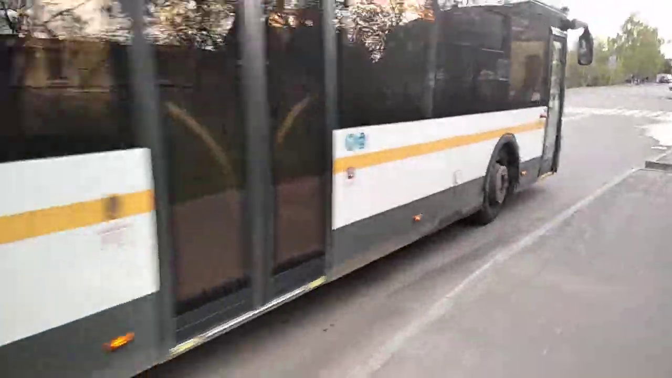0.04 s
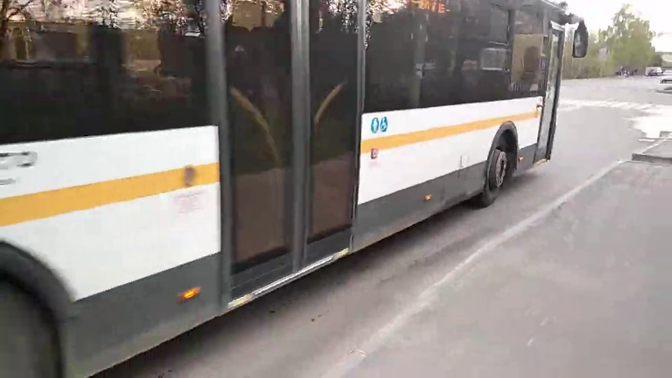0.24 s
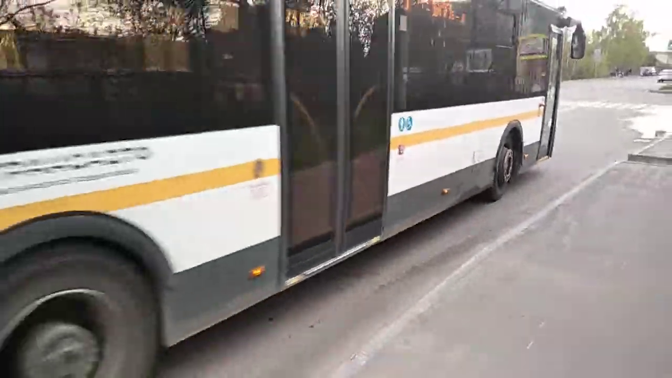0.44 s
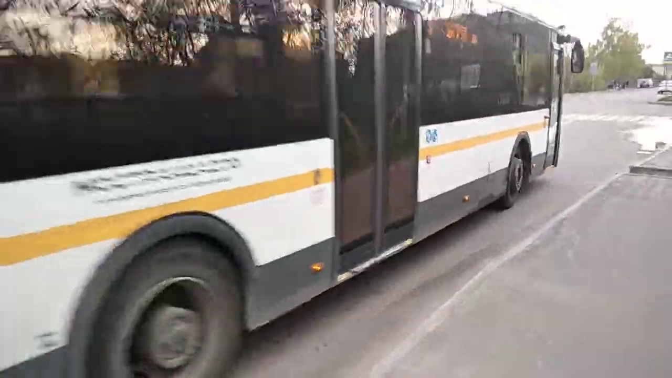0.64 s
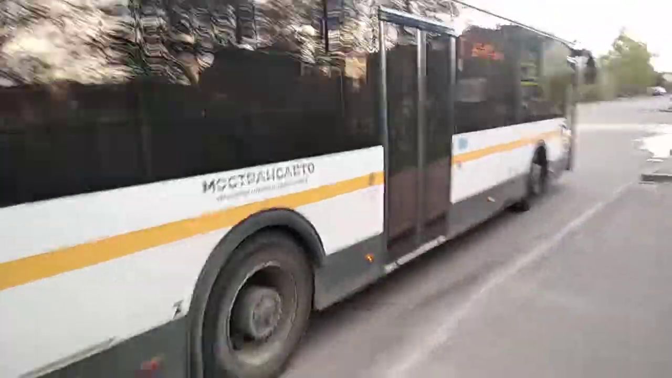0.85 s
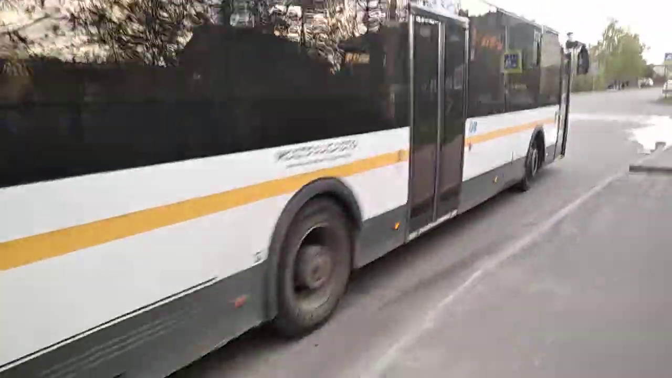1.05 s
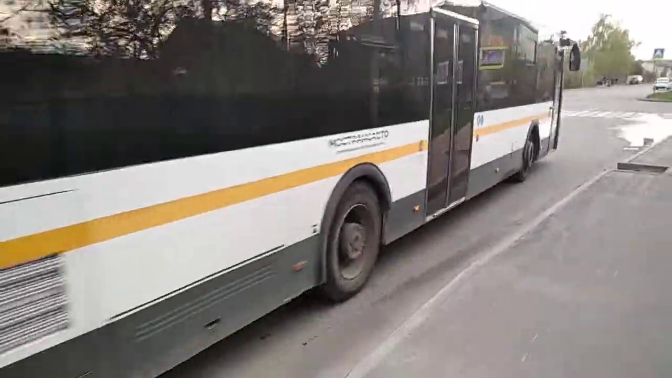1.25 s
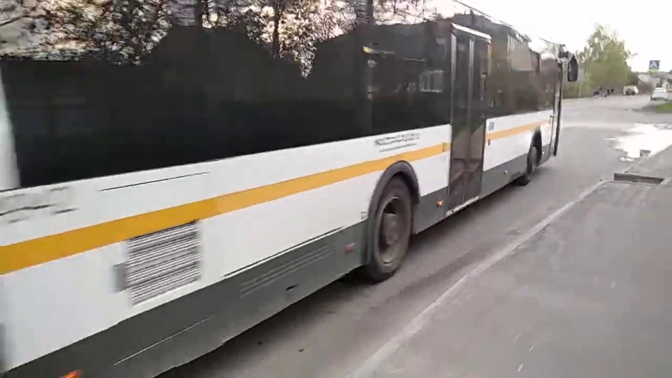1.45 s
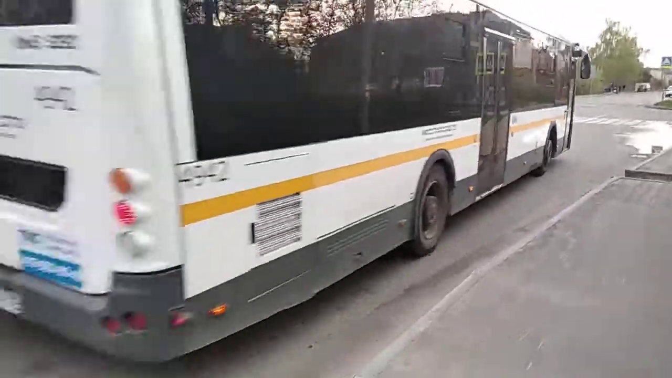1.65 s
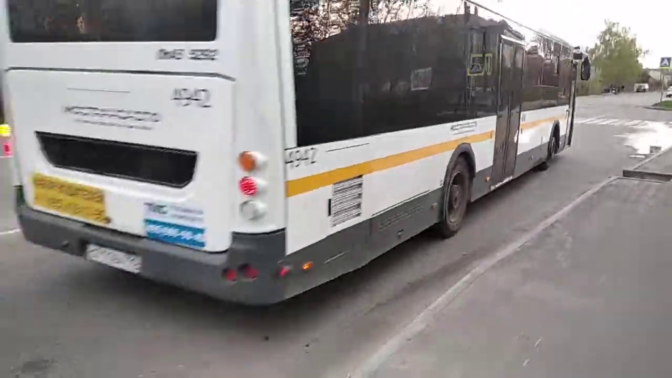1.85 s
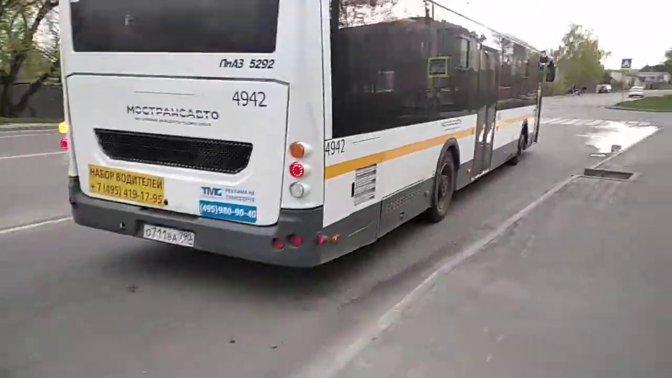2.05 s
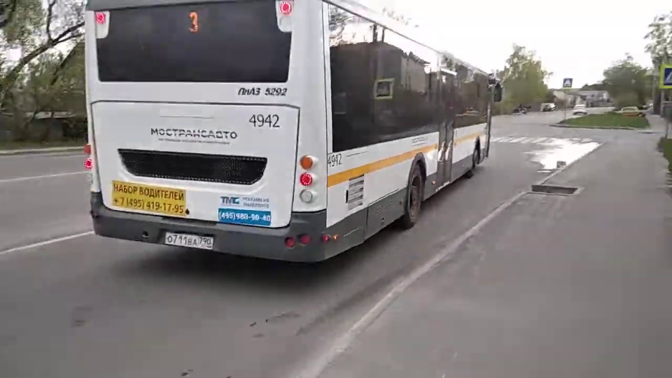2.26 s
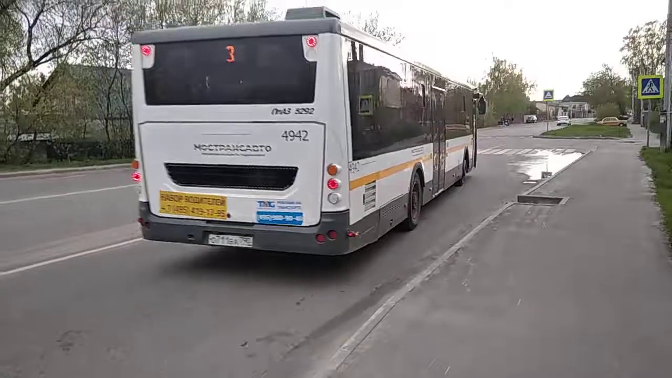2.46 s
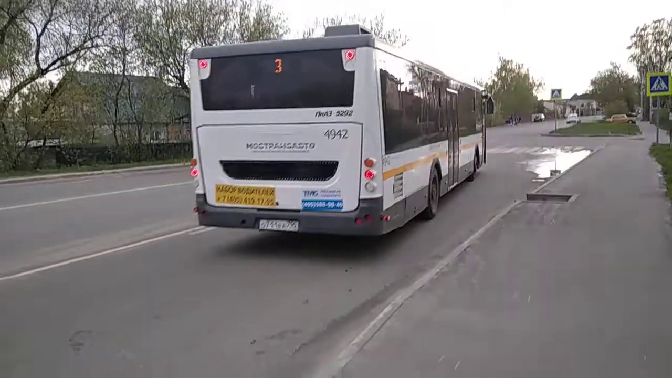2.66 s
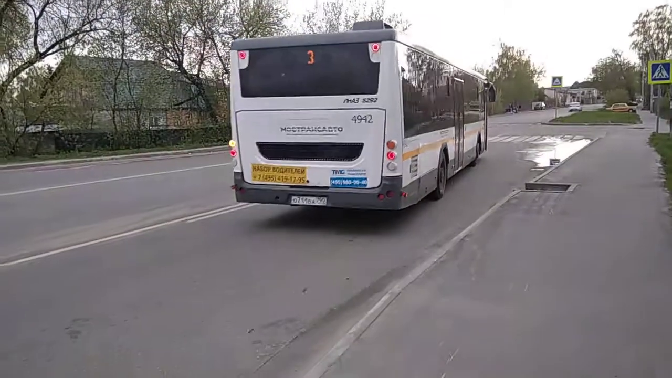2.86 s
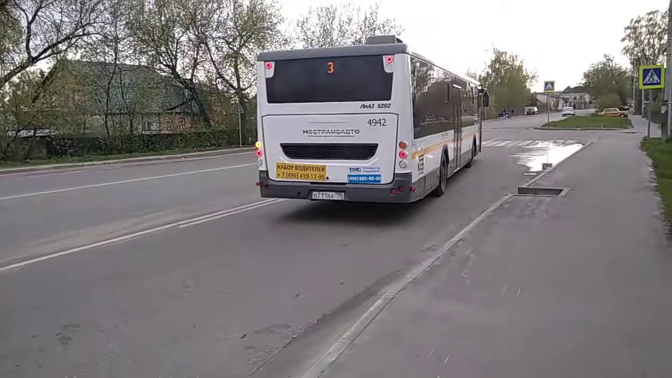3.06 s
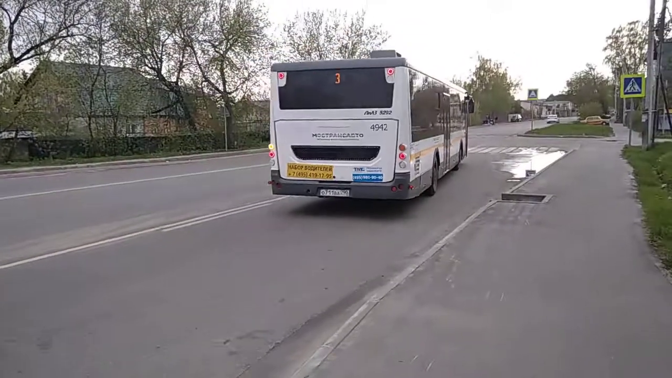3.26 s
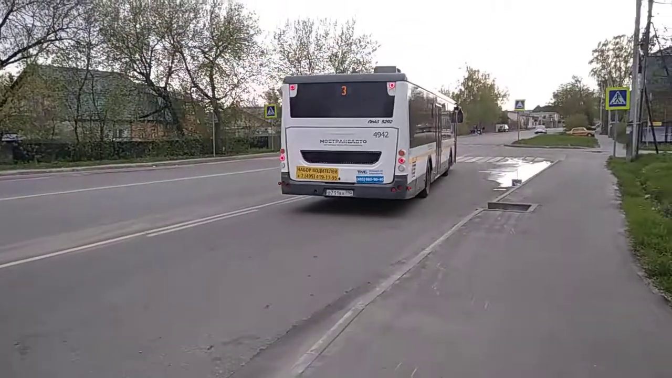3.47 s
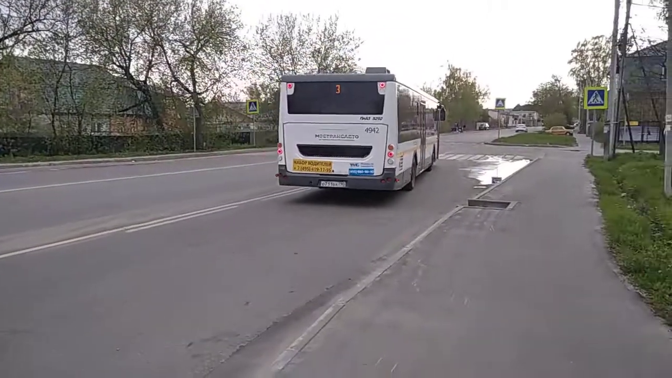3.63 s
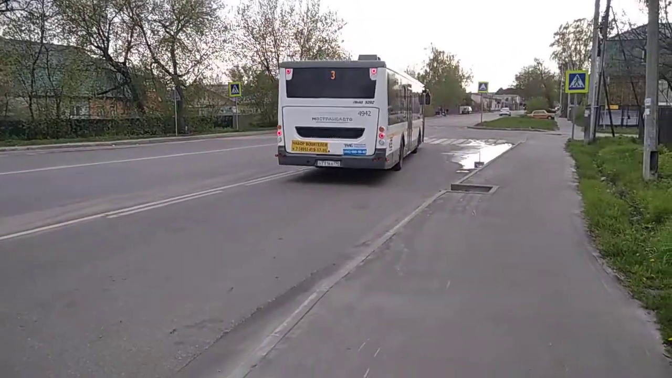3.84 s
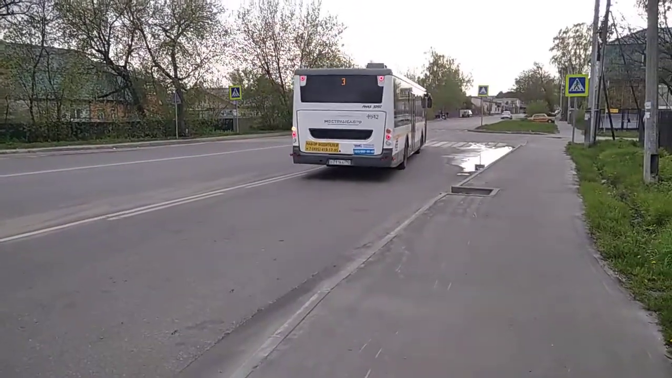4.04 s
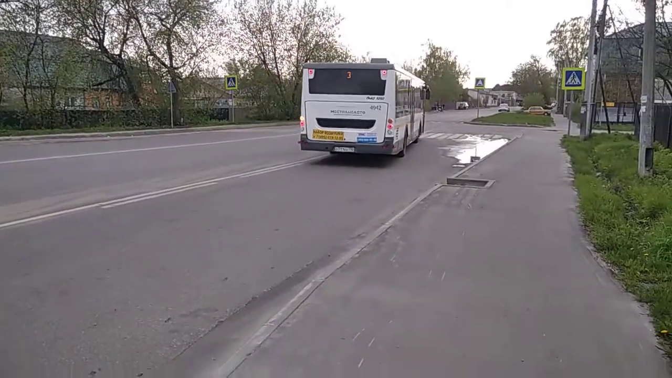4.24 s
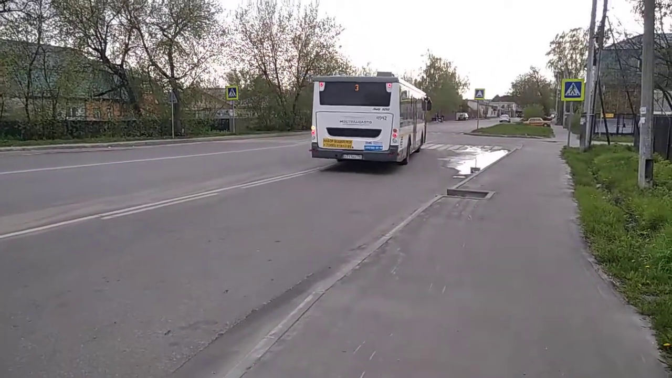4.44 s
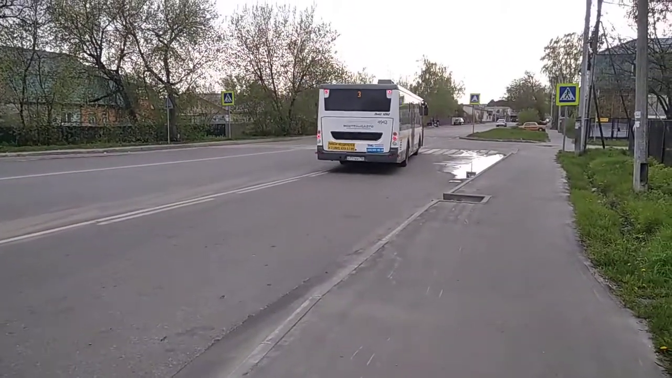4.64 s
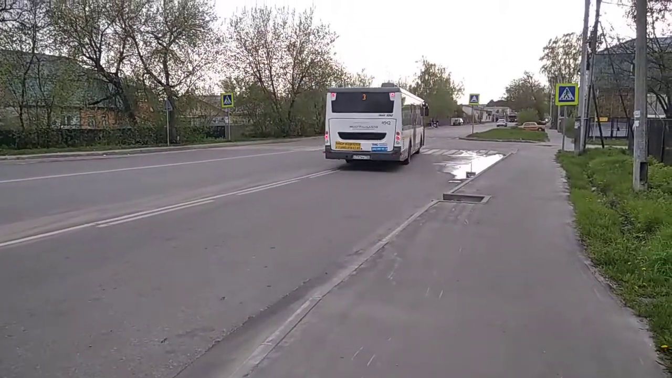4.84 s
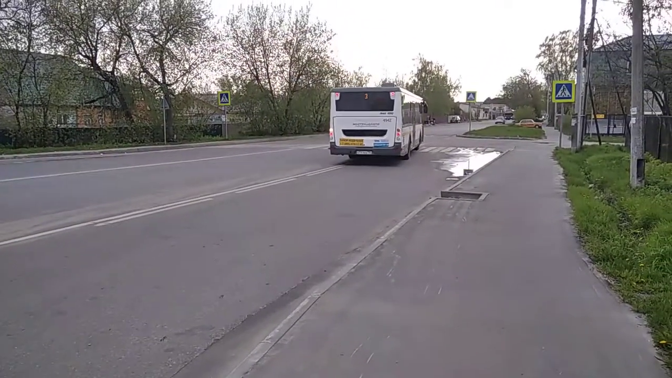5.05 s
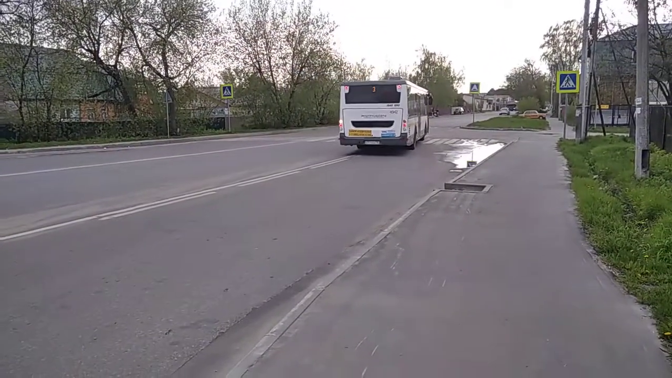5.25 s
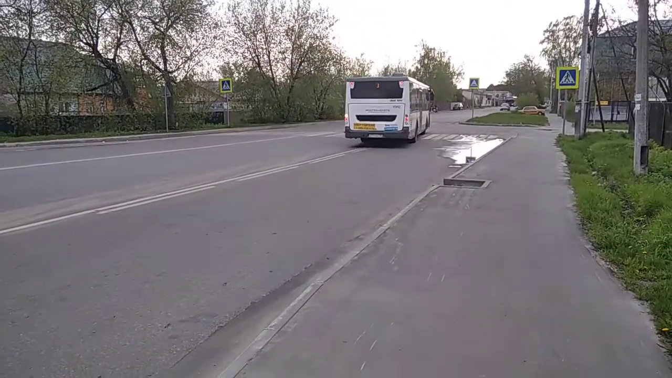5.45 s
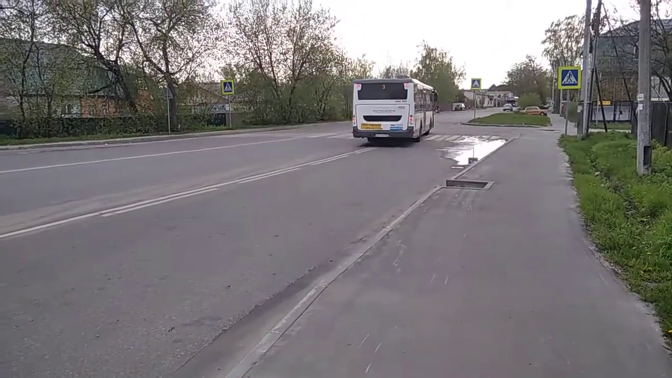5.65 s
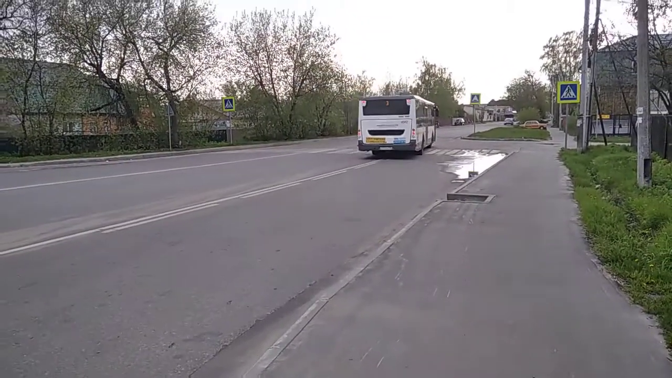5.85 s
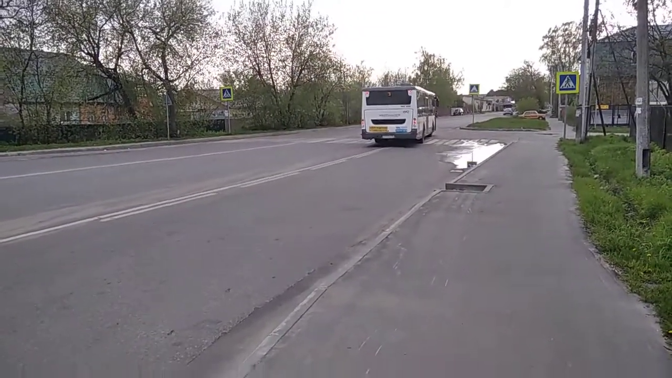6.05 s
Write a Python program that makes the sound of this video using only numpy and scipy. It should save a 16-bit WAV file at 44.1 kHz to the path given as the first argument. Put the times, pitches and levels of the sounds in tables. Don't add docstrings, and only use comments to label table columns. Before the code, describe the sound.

On an open street, a hand-held stereo microphone stands about three metres from a passing diesel bus. From the start a deep, steady exhaust throb near 56 Hz sits under a rough engine roar, with clatter and an airy intake hiss building over the first 0.7 seconds. Between about 0.4 and 1.4 seconds, thin axle, pump, air-valve and rising turbo whines flicker through. The engine and tail pipe sweep by at roughly 1.75 to 1.9 seconds, the fullest moment, and a humming cooling fan stands out behind. From 2.4 seconds the bus recedes, its treble thinning and colour shifting with echoes off the road. At about 5 seconds the driver lifts off; the pitch slides down quickly and the engine fades low. Small plastic case ticks come at 5.28 and 5.69 seconds over a quiet wash of far traffic and leaves.

```python
import sys
import numpy as np
from scipy import signal
from scipy.fft import rfft, irfft
from scipy.io import wavfile
from scipy.ndimage import uniform_filter1d, map_coordinates

SR = 44100
rng = np.random.default_rng(int(sys.argv[2]) if len(sys.argv) > 2 else 0)


def attenuation_scalar(level_db):
    decades = np.asarray(level_db, float) / 20
    return 10 ** decades


def dump(signal):
    limited = np.clip(np.atleast_2d(signal).T, -1, 1)
    pcm = np.round(limited * 32767).astype(np.int16)
    wavfile.write(sys.argv[1], SR, pcm)


N = 269010
TIME = np.arange(N) / SR

# [time_s, firing_hz, level_db]
FIRING = [(0, 56.2, -27.5), (.3, 56.5, -25.5), (1.2, 57.4, -27.7), (1.5, 58.7, -27.4), (1.8, 59.9, -29),
          (2.15, 60.4, -29.2), (2.7, 59.7, -32.1), (3, 59.05, -35.8), (3.5, 59.2, -34), (3.8, 58.1, -37.6),
          (4.3, 56.85, -41.5), (4.55, 55.65, -37), (4.8, 54.5, -38.7), (5, 52.1, -43), (5.15, 48, -45.5),
          (5.35, 40.6, -52), (5.6, 35.7, -54), (6.1, 32.5, -51.5)]
# [multiple of firing rate, under_firing_db]
UNEVEN_ORDERS = [(0.752, -23), (1.25, -25), (1.75, -34), (2, -25.5), (2.5, -26), (3, -26), (4, -28.5)]
# [nearest_db, share of distance loss, from_behind_db, lift_off_db, corner_db]
BAY_LAYERS = [
    (-38, 0.89, 1.05, -12, 3.5),
    (-44.5, 0.98, 0.9, -4.5, 0.5),
    (-46, 1.2, -2, -8, 2),
    (-45, 1.14, -6, -11, -1.5),
]
# [freq_hz, level_db]
RUMBLE_SPECTRUM = [(41, -32), (70, -5), (85, -7), (107, -10), (161, -10), (215, -12), (258, -11.5),
                   (321, -11.5), (531, -33.5), (620, -25), (810, -32), (1360, -120)]
ROAR_SPECTRUM = [(280, -4.5), (480, 0.5), (603, -7.5), (1060, -6), (1230, -9), (1540, -7.5), (2190, -13),
                 (2800, -27), (3640, -20), (6160, -120)]
CLATTER_SPECTRUM = [(1350, 1), (2300, 3), (3040, 3.5), (3280, -1.5), (5070, -2), (7600, -8), (9880, -3),
                    (16700, -120)]
INTAKE_SPECTRUM = [(4000, -6.5), (6800, -2.5), (7600, -3), (9320, -1), (11500, -7.5), (13700, -12),
                   (14200, -9.5)]
# [multiple of shaft rate, under_rumble_db]
COMPRESSOR_LINES = [(2, -11), (3, -16), (6, -14)]
# [start_s, hold_s, level_db, rise_db_per_s, fall_db_per_s]
FAN_SWELLS = [
    [(.3, .01, -45.5, 43, 11), (1.38, 0.0091, -46, 60, 40), (1.72, 1.85, -40, 54, 8.5),
     (4.9, 0.17, -51.5, 20, 25)],
    [(.3, 0.0091, -64, 60, 32), (1.75, .25, -42, 28, 26), (3, 0.24, -47.5, 30, 19),
     (5.15, .01, -52.5, 18, 80)],
    [(.7, 0.63, -53, 7, 30), (1.7, 0.54, -43, 25, 14.5), (3.7, 0.47, -59, 36, 24), (5, .15, -59.5, 34, 38)],
]
# [start_s, hold_s, level_db, rise_db_per_s, fall_db_per_s]
PUMP_SWELLS = [
    [(.4, .14, -53.5, 70, 140), (.79, .31, -52, 120, 45), (2.4, .01, -66, 12, 10)],
    [(.55, .35, -60, 30, 50), (1.1, .5, -62, 40, 50), (2.1, .7, -64, 30, 20)],
    [(1.2, .15, -66, 40, 30)],
]
# [time_s, pitch_hz]
TURBO_PITCH = [(.6, 5840), (1.1, 6190), (1.9, 6740), (2.55, 7020), (3.1, 7090), (4.3, 7030)]
# [start_s, hold_s, level_db, rise_db_per_s, fall_db_per_s]
TURBO_SWELLS = [(.73, .08, -61, 200, 100), (1.08, .04, -63, 40, 20), (1.9, .01, -65, 35, 30),
                (2.55, .6, -68, 25, 24), (3.7, .2, -73, 14, 20)]
AXLE_SWELLS = [(.45, .15, -48, 100, 60), (.79, .02, -42, 60, 150), (.93, .12, -46, 60, 90)]
VALVE_SWELLS = [(.76, .14, -58, 200, 60), (1, .3, -63, 60, 100)]
# [freq_hz, level_db]
STREET_SPECTRUM = [(20, -40), (34, -10), (52, -7), (75, -21), (125, -9.5), (190, -15.5), (266, -11.5),
                   (529, -32), (764, -27), (1380, -33), (1760, -29), (3340, -49), (6030, -41),
                   (14200, -60.5)]
# [start_s, peak_db, ring_hz, second_ring_hz, crack share]
CASE_TICKS = [
    (5.2772, -42, 7500, 9300, .4),
    (5.2808, -38, 240, 1100, .01),
    (5.282, -51, 8500, 12500, .3),
    (5.6917, -41, 900, 7200, .02),
    (5.692, -35, 1750, 4200, .02),
    (5.6933, -37, 1780, 6900, .02),
]
# [time_s, left_lag_samples, left_treble_lean_db]
CAMERA_TURN = [(0, 21, -2), (.6, 17, 0), (1, 16, 9), (1.5, 12, 10), (2, 5.5, 12.5), (2.75, 0.5, 8.5),
               (3.3, -0.7, 7), (4.5, 1.5, 6), (5.5, -3.5, 7.5), (6.1, -4.5, 13)]
# [centre_hz, width_hz, level_db]
LEFT_AIMED = [(484, 68, -7), (1373, 150, -4.5), (1700, 250, -2), (2860, 840, -1), (4070, 195, 11.5),
              (4690, 290, 7), (6130, 400, 2), (7120, 160, 6), (9500, 950, 3.5)]
RIGHT_AIMED = [(503, 79, -9.5), (1290, 89, -11), (1770, 400, -8.5), (2330, 260, -0.5), (3310, 79, 5.5),
               (6240, 470, 2.5), (7000, 120, -2), (8100, 450, 7.5)]
LEFT_BESIDE = [(1940, 230, -1), (3860, 50, 6), (4140, 120, 0), (6900, 740, -2), (9450, 460, 0)]
RIGHT_BESIDE = [(666, 31, -4), (3400, 110, 0.5), (4260, 100, 7), (5900, 500, 1.5), (6900, 300, -1)]
# [centre_hz, width_hz, lag_rad]
CASE_TWIST = [(2150, 510, 1), (7100, 700, -1.1)]
# [freq_hz, likeness 0-1]
PORT_LIKENESS = [(60, .999), (200, 1), (450, 0.95), (850, 0.97), (1250, .62), (1800, 0.52), (3400, 0.42),
                 (6000, 0.25), (12000, .03)]
# [centre_s, length_s, centre_hz, width_hz, level_db]
PASSING_ECHOES = [(.1, .25, 137, 40, -0.5), (.1, 0.22, 393, 80, 3.5), (.3, 0.37, 3480, 110, 0),
                  (1.3, 0.98, 157, 35, -1), (1.45, 0.25, 2090, 80, -4), (1.2, 0.23, 3030, 100, -7),
                  (4.3, 0.38, 5480, 120, 9.5), (5.5, 0.23, 180, 40, -4)]
# [time_s, first_dip_hz, second_dip_hz]
ROAD_DIPS = [(2.3, 2600, 4950), (2.8, 2900, 5250), (3.4, 2950, 6000), (4.5, 2750, 6200), (5, 2900, 6400),
             (5.6, 3500, 5800), (6.1, 3450, 5650)]

PASS_S, KERB_M, SPEED_MPS, GAIN_MPS2 = 1.92, 3.34, 2.91, 0.6
CORNER_S, CORNER_LASTS_S = 1.75, .07
BEHIND_S, BEHIND_TAKES_S = 2.43, 0.34
LIFT_S, LIFT_TAKES_S, FAN_LIFT_DB = 5.01, 0.45, -8
SPOOL_S, SPOOL_DB = 0.69, -4
AXLE_HZ, AXLE_HZ_PER_S = 280, 111
VALVE_HZ, VALVE_HZ_PER_S = 7600, 1200
COMPRESSOR_RATIO, FAN_RATIO, PUMP_RATIO = .76, 3.547, 56 / 3
STREET_DB = -51
TICK_T60_S, TICK_CYCLES, OVERTONE_DB = .004, 4, -8
AIM_BESIDE, AIM_BEHIND = 0.29, 1
DIP_DB, DIP_WIDTH, DIP_S, DIP_TAKES_S = -6, .036, 2.25, .15
BAND_TOP_HZ = 14292


def unit(x):
    return x / np.sqrt(np.mean(x ** 2) + 1e-20)


def along(points, hz):
    f, v = np.transpose(points)
    return np.interp(np.log(hz + 1), np.log(f + 1), v)


def curves(rows, t=TIME):
    s, *columns = np.transpose(rows)
    return [np.interp(t, s, column) for column in columns]


def bell(x, centre, width):
    return np.exp(-.5 * ((x - centre) / width) ** 2)


def step(s, takes, t=TIME):
    return np.clip((t - s) / takes, 0, 1)


def swells(rows):
    levels = []
    for start, hold, db, rise, fall in rows:
        before = np.maximum(start - TIME, 0)
        after = np.maximum(TIME - start - hold, 0)
        levels.append(db - rise * before - fall * after)
    return np.max(levels, axis=0)


def wobble(rate):
    return map_coordinates(rng.standard_normal(int(N * rate / SR) + 4), [TIME * rate])


def tone(hz, db, blur_hz, shake_db):
    turns = np.cumsum(hz + blur_hz * wobble(25)) / SR
    level = np.sqrt(2) * attenuation_scalar(db + shake_db * wobble(14))
    return level * np.sin(2 * np.pi * (turns + rng.random()))


def drift(shape, bands, frames):
    field = uniform_filter1d(rng.standard_normal(shape), size=bands, axis=-2)
    return unit(uniform_filter1d(field, size=frames, axis=-1))


def rush(spectrum, patchy_db):
    hz, _, z = signal.stft(rng.standard_normal((2, N)), SR, nperseg=2048, noverlap=1792)
    patches = patchy_db * drift(z.shape[1:], bands=24, frames=7)
    z = z * attenuation_scalar(along(spectrum, hz)[:, None] + patches)
    return unit(signal.istft(z, SR, nperseg=2048, noverlap=1792)[1][:, :N])


def exhaust():
    hz, db = curves(FIRING)
    orders = sum(tone(k * hz, db + under_db, blur_hz=0.38, shake_db=0.5) for k, under_db in UNEVEN_ORDERS)
    return tone(hz, db, blur_hz=0.17, shake_db=1.05) + orders


def bay_levels():
    since = TIME - PASS_S
    along_road_m = since * (SPEED_MPS + GAIN_MPS2 * since / 2)
    spread_db = -10 * np.log10(1 + (along_road_m / KERB_M) ** 2)
    behind = step(BEHIND_S, BEHIND_TAKES_S)
    lifted = step(LIFT_S, LIFT_TAKES_S)
    corner = bell(TIME, CORNER_S, CORNER_LASTS_S)
    return [db + share * spread_db + behind_db * behind + lift_db * lifted + corner_db * corner
            for db, share, behind_db, lift_db, corner_db in BAY_LAYERS]


def engine_bay():
    rumble_db, roar_db, clatter_db, hiss_db = bay_levels()
    beat = np.cos(2 * np.pi * np.cumsum(curves(FIRING)[0]) / SR)
    surge = wobble(4.84)
    rumble_db = rumble_db - 1.6 + 1.5 * beat + .3 * wobble(8)
    roar_db = roar_db + 5 + 0.33 * beat + 0.45 * surge
    clatter_db = clatter_db + 1 + .4 * beat + .5 * surge + .45 * wobble(35)
    unspooled_db = SPOOL_DB * (1 - step(0, SPOOL_S))
    hiss_db = hiss_db + unspooled_db + 3.5 + 0.23 * surge + .45 * wobble(35)
    rumble = attenuation_scalar(rumble_db) * rush(RUMBLE_SPECTRUM, patchy_db=.4)
    roar = attenuation_scalar(roar_db) * rush(ROAR_SPECTRUM, patchy_db=0.08)
    clatter = attenuation_scalar(clatter_db) * rush(CLATTER_SPECTRUM, patchy_db=1.74)
    hiss = attenuation_scalar(hiss_db) * rush(INTAKE_SPECTRUM, patchy_db=1)
    return rumble + roar + clatter + hiss


def fan():
    hz = FAN_RATIO * curves(FIRING)[0]
    first_db, half_db, second_db = map(swells, FAN_SWELLS)
    first = tone(hz, first_db, blur_hz=.3, shake_db=.7)
    second = tone(2 * hz, second_db, blur_hz=.6, shake_db=1.3)
    half = tone(3 / 2 * hz, half_db - 4, blur_hz=2.81, shake_db=3)
    lift_db = FAN_LIFT_DB * step(LIFT_S + LIFT_TAKES_S / 2, LIFT_TAKES_S)
    return attenuation_scalar(lift_db) * (first + second + half)


def compressor():
    hz = COMPRESSOR_RATIO * curves(FIRING)[0]
    rumble_db = bay_levels()[0]
    return sum(tone(k * hz, rumble_db + under_db, blur_hz=0.49, shake_db=1.5)
               for k, under_db in COMPRESSOR_LINES)


def whines():
    mesh_hz = PUMP_RATIO * curves(FIRING)[0]
    pump = sum(tone(k * mesh_hz, swells(rows), blur_hz=3, shake_db=1)
               for k, rows in zip((2, 3, 5), PUMP_SWELLS))
    turbo = tone(curves(TURBO_PITCH)[0], swells(TURBO_SWELLS), blur_hz=45, shake_db=3.5)
    axle_hz = AXLE_HZ + AXLE_HZ_PER_S * TIME
    axle = (1 + wobble(45) / 4) * tone(axle_hz, swells(AXLE_SWELLS), blur_hz=7, shake_db=1)
    valve_hz = VALVE_HZ + VALVE_HZ_PER_S * TIME
    valve = tone(valve_hz, swells(VALVE_SWELLS), blur_hz=120, shake_db=4)
    return attenuation_scalar(2) * (pump + turbo + axle + valve)


def ticks():
    out, t = np.zeros(N), np.arange(SR // 50) / SR

    def dying(hz):
        return attenuation_scalar(-60 * t / (TICK_T60_S + TICK_CYCLES / hz))

    for s, db, low_hz, high_hz, rough in CASE_TICKS:
        crack = rough * np.diff(rng.standard_normal(len(t) + 1))
        low = dying(low_hz) * (np.sin(2 * np.pi * low_hz * t) + crack)
        high = attenuation_scalar(OVERTONE_DB) * dying(high_hz) * np.sin(2 * np.pi * high_hz * t)
        onset = 1 - np.exp(-t / 0.0002)
        out[round(s * SR):][:len(t)] -= attenuation_scalar(db) * onset * (low + high)
    return out * attenuation_scalar([[2.5], [-2.5]])


def street():
    return attenuation_scalar(STREET_DB + .3 * wobble(3)) * rush(STREET_SPECTRUM, patchy_db=.3)


def echoes(hz, t):
    ripple = 1.69 * drift((2, len(hz), len(t)), bands=4, frames=70) * (hz > 500)
    passing = sum(db * bell(t, s, life) * bell(hz, c, w) for s, life, c, w, db in PASSING_ECHOES)
    dips = sum(bell(hz, dip_hz, DIP_WIDTH * dip_hz) for dip_hz in curves(ROAD_DIPS, t))
    return ripple + passing + DIP_DB * step(DIP_S, DIP_TAKES_S, t) * dips


def ports(shared, scattered):
    hz, t, (a, b) = signal.stft(np.array([shared, scattered]), SR, nperseg=1024, noverlap=768)
    hz = hz[:, None]
    lag, lean_db = curves(CAMERA_TURN, t)
    aim = AIM_BESIDE + (AIM_BEHIND - AIM_BESIDE) * step(BEHIND_S, BEHIND_TAKES_S, t)

    def colour(port):
        return sum(height * bell(hz, centre, width) for centre, width, height in port)

    detour = 1 - 0.24 / (1 + (hz / 900) ** 4)
    delay = np.exp(-1j * np.pi * hz * detour * lag / SR)
    delay = delay * np.exp(-.5j * aim ** 2 * colour(CASE_TWIST))
    shadow_db = lean_db / 2 / (1 + (7600 / (hz + 1)) ** 8)
    left_echo_db, right_echo_db = echoes(hz, t)
    left_db = aim * colour(LEFT_AIMED) + (1 - aim) * colour(LEFT_BESIDE) + shadow_db + left_echo_db
    right_db = aim * colour(RIGHT_AIMED) + (1 - aim) * colour(RIGHT_BESIDE) - shadow_db + right_echo_db
    turn = np.arccos(along(PORT_LIKENESS, hz)) / 2
    left = (np.cos(turn) * a + np.sin(turn) * b) * delay * attenuation_scalar(left_db)
    right = (np.cos(turn) * a - np.sin(turn) * b) / delay * attenuation_scalar(right_db)
    return signal.istft(np.array([left, right]), SR, nperseg=1024, noverlap=768)[1][:, :N]


def scene():
    shared, scattered = engine_bay() + street()
    bus_lines = exhaust() + fan() + compressor() + whines()
    return ports(shared + bus_lines, scattered) + ticks()


def roll_off(x):
    return signal.sosfilt(signal.butter(12, 14292, fs=SR, output="sos"), x)


def record(dry):
    in_band = np.fft.rfftfreq(N, 1 / SR) < BAND_TOP_HZ
    kept = irfft(rfft(dry) * in_band, N)
    return roll_off(kept)


dry = scene()
out = record(dry)
dump(out)
```